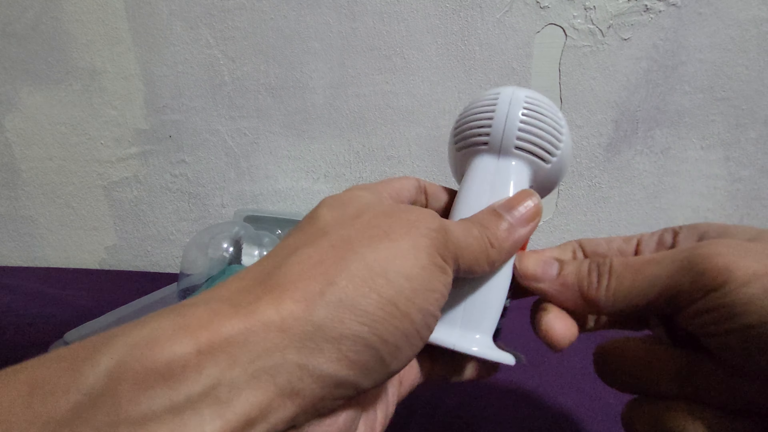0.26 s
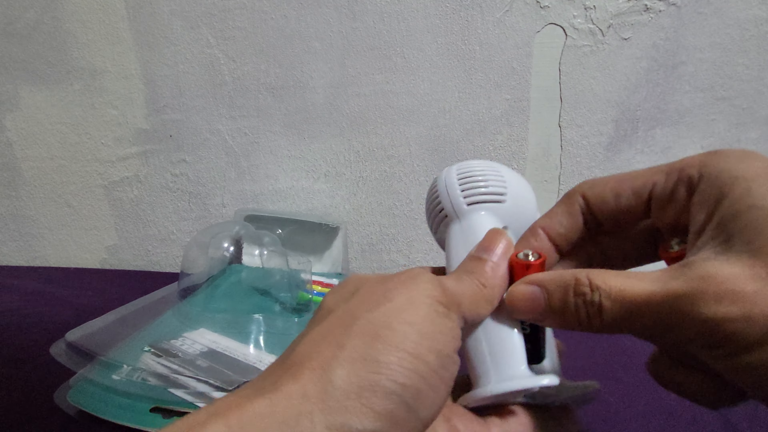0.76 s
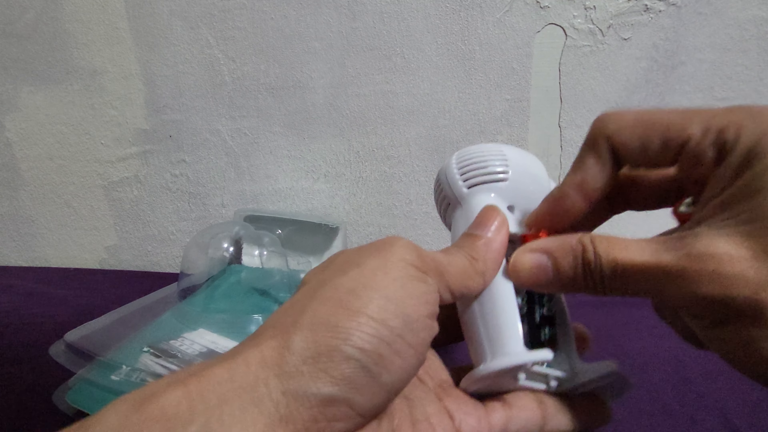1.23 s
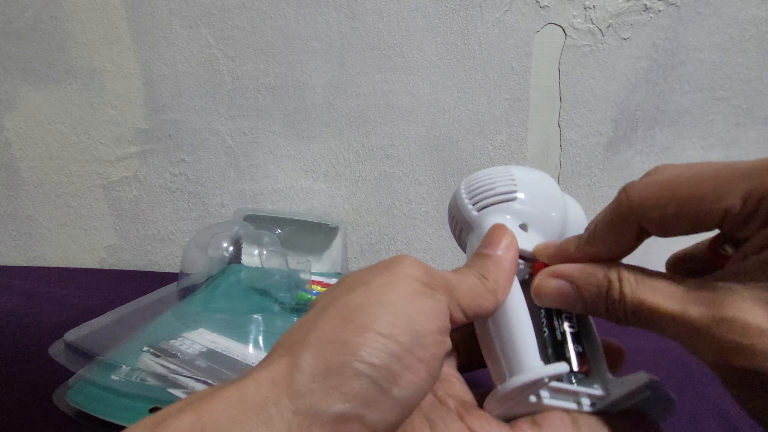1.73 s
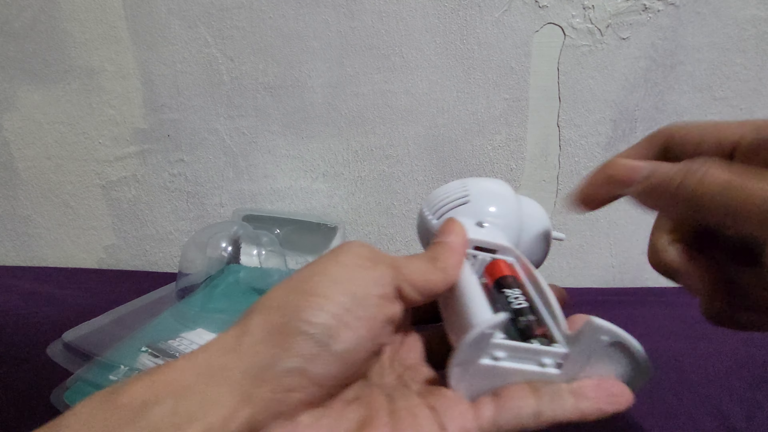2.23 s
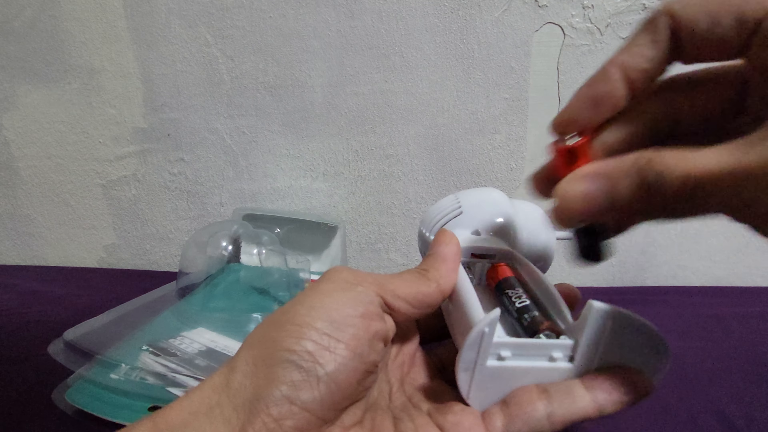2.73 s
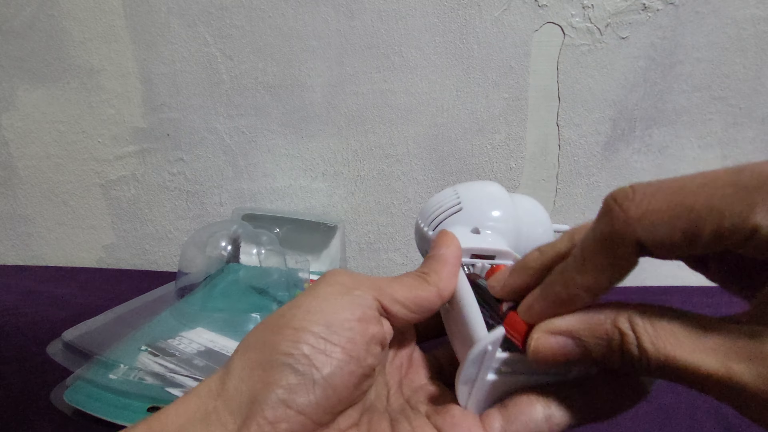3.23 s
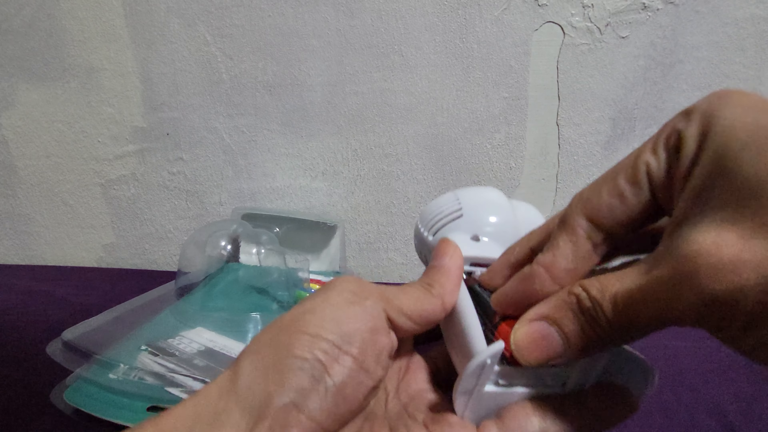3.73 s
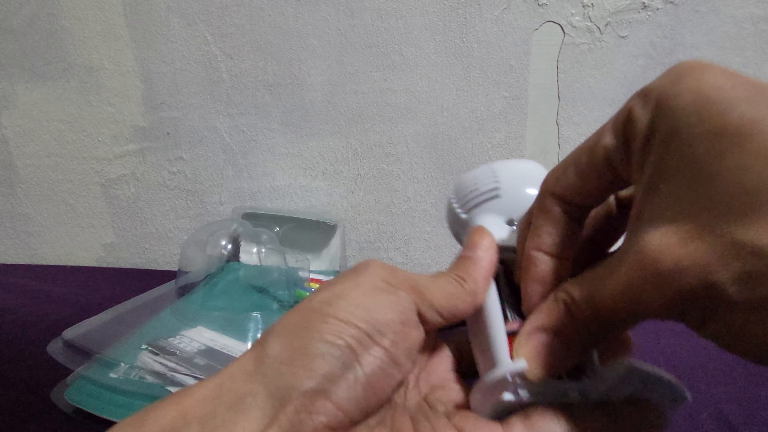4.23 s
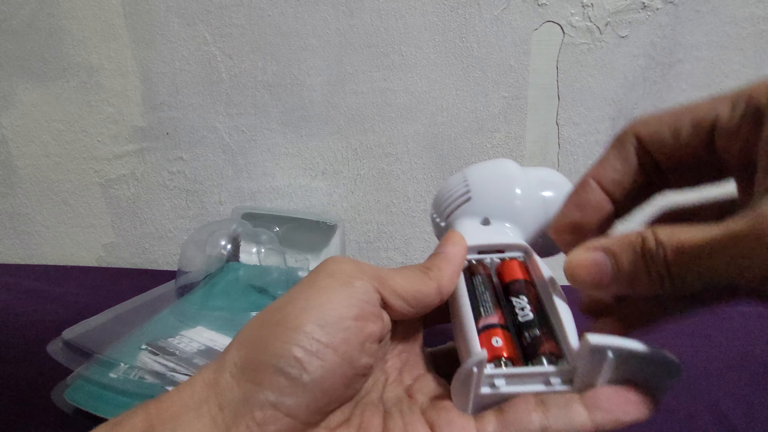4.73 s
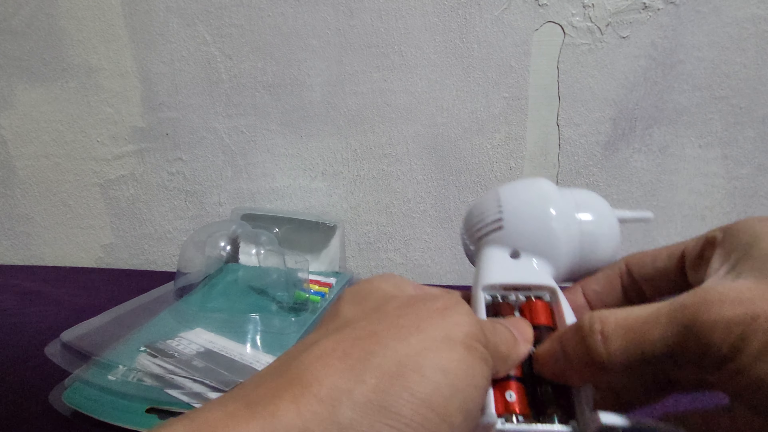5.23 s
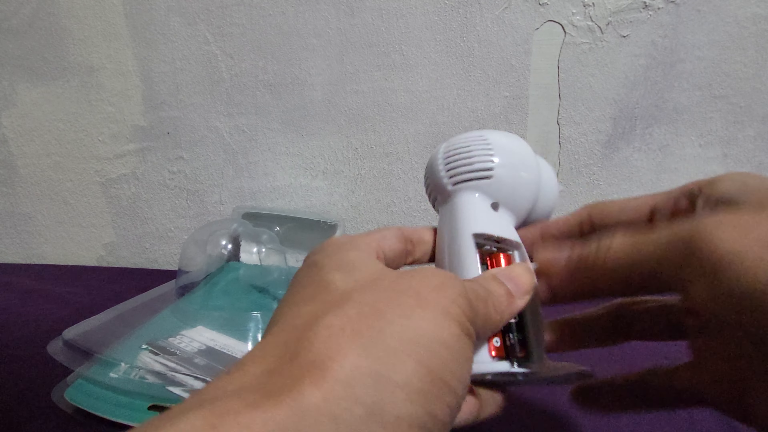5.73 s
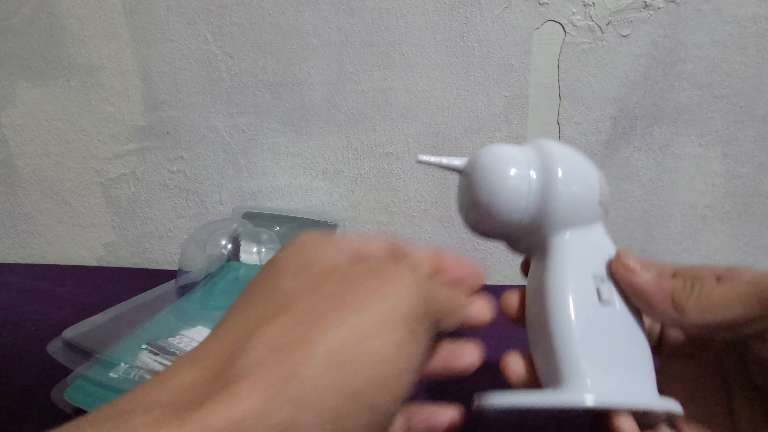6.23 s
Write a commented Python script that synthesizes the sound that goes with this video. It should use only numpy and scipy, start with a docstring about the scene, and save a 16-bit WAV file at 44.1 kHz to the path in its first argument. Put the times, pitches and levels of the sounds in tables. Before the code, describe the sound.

Two batteries are fitted into a light plastic gadget: scattered dry clicks and finger slides, a cluster of sharp snaps, a quiet gap of about a second, then a rough scrape with bright hard knocks. Later handling is faint. Close stereo pickup in a small room with short reflections, dull distant traffic rumble, and two barely noticeable soft tones dropping in pitch outside.

```python
"""Batteries going into a plastic gadget

Two batteries are pushed into the hollow handle of a small plastic gadget, close to a phone in a quiet room.
Every knock or slip is a burst of tiny pushes that rings the plastic; sliding fingers are dense friction grains.
A contact spring grates faintly, and sparse reflections make the room answer. Behind lie shaped noise for street
wash and microphone hiss, wavering tones for far engines and hums, and two brief tones that fall in pitch."""
import sys
import numpy as np
from scipy import signal
from scipy.io import wavfile
from scipy.ndimage import uniform_filter1d

SR = 44100
rng = np.random.default_rng(int(sys.argv[2]) if len(sys.argv) > 2 else 0)


def dump(signal):
    """Clip the signal to [-1, 1] and save it as 16-bit WAV at the path in sys.argv[1]."""
    limited = np.clip(np.atleast_2d(signal).T, -1, 1)
    pcm = np.round(limited * 32767).astype(np.int16)
    wavfile.write(sys.argv[1], SR, pcm)


N = 285327

# Ways each part of the gadget can vibrate, before the grip, the spot struck and damping change them:
# pitch_hz [Hz], level_db [dB, relative], fade_ms [ms to fall by 60 dB]
BASE = [(506, -14, 33), (653, -4, 8), (814, -0.5, 23), (925, -5.5, 38), (1120, -11, 12)]
HANDLE_AIR = [(1373, -9, 38), (1504, -9.5, 26)]
SHELL = [(1680, -4.5, 23), (1836, -1.5, 13), (2180, -6.5, 22), (2300, -9, 6.4)]
RIBS = [(2620, -2, 24), (2960, -12.5, 88), (3210, -1.1, 16), (3776, -3.75, 18), (4260, -3, 16),
        (4670, -9, 40), (5130, 2, 9.1)]
EDGES = [(5900, 0, 12), (6560, 0, 14), (7300, 0, 12), (8100, 0, 11), (8800, 0, 11), (9800, 0, 11),
         (10700, -1, 10), (11700, -3, 9), (12700, -4, 9), (13800, -6, 9), (15000, -8, 9)]
GADGET = [BASE, HANDLE_AIR, SHELL, RIBS, EDGES]


def amp(db):
    """Turns decibels into a plain multiplier."""
    return 10 ** (np.asarray(db) / 20)


def evened(x):
    """Scales a sound to an average (RMS) level of one."""
    return x / np.sqrt(np.mean(x ** 2) + 1e-20)


def unit(x):
    """Scales a ring so that the mean of its channels has an energy of one."""
    middle = np.atleast_2d(x).mean(0)
    return x / np.sqrt((middle ** 2).sum() + 1e-20)


def read(points, hz):
    """Reads a table of (pitch, value) at any pitch, evenly along a logarithmic pitch scale."""
    point_hz, value = np.transpose(points)
    return np.interp(np.log(hz + 1), np.log(point_hz + 1), value)


def curve(rows):
    """Joins the rows of a table by straight lines in time, one curve for each column after the first."""
    start_s, *columns = np.transpose(rows)
    return [np.interp(np.arange(N) / SR, start_s, column) for column in columns]


def resonate(x, hz, width_hz):
    """Shifts hz down to zero, smooths and shifts back: a resonance that follows a curve."""
    turn = np.exp(2j * np.pi * np.cumsum(hz * np.ones(N)) / SR)
    keep = np.exp(-np.pi * width_hz / SR)
    smooth = signal.lfilter([1 - keep], [1, -keep], x / turn)
    return 2 * (turn * smooth).real


def room_tone():
    """Steady low wash of the street and hiss of the microphones: noise shaped by pitch, with drifting patches."""
    # loudness of the noise over pitch: pitch_hz [Hz], density_db [dB per Hz, relative]
    noise_colour = [(30, -2.5), (54, 0.5), (167, -7), (223, -12.5), (298, -14.5), (378, -19), (455, -27.5),
                    (1000, -29), (1450, -34.5), (2500, -57), (4000, -60), (6300, -56), (8500, -49),
                    (10500, -48.5), (11700, -50.5), (13000, -56.5), (16000, -73)]
    # likeness of left and right: pitch_hz [Hz], likeness [no unit, limited below to -1..1]
    ear_likeness = [(60, 0.76), (150, 0.99), (380, 0.7), (950, -0.15), (2380, -1.6), (5980, -0.7),
                    (15000, 1)]
    # balance of the two sides: pitch_hz [Hz], left_minus_right_db [dB]
    ear_balance = [(60, 4), (240, -0.5), (950, 0.5), (3770, -7), (15000, 7)]
    # swell of the deepest rumble: time_s [s], level_db [dB, relative]
    traffic_swell = [(0, -5.5), (1.5, -3.5), (3.998, -3), (6.47, -2)]
    level_db = -46

    frames, hz = N // 512 + 5, np.fft.rfftfreq(2048, 1 / SR)
    a, b, c, d, patches, drift = rng.standard_normal((frames, 1025, 6)).T
    patches = evened(uniform_filter1d(uniform_filter1d(patches, 12, 0), 10, 1))
    # broad slow changes of colour
    drift = evened(uniform_filter1d(uniform_filter1d(drift, 150, 0), 25, 1))

    same = np.clip(read(ear_likeness, hz), -1, 1)[:, None]
    left, other = a + 1j * b, c + 1j * d
    spectrum = np.array([left, same * left + np.sqrt(1 - same ** 2) * other])

    half_lean_db = read(ear_balance, hz)[:, None] / 2
    swell_db = np.interp(np.arange(frames) * 512 / SR, *np.transpose(traffic_swell))
    swell_db = swell_db * (hz < 110)[:, None]
    shape_db = read(noise_colour, hz)[:, None] + swell_db + 1.3 * patches + 0.89 * drift
    spectrum *= amp(shape_db + np.array([half_lean_db, -half_lean_db]))
    noise = signal.istft(spectrum, nperseg=2048, noverlap=1536)[1][:, :N]
    return amp(level_db) * evened(noise)


def drones():
    """Far engines and machine hums: steady tones mixed with narrow wavering noise, stronger on the left."""
    # two engines and a mains hum that starts up: time_s [s], pitch_hz [Hz], level_db [dB, before the mix below]
    engine_low = [(1.0, 62, -62), (1.6, 64.2, -50), (1.85, 60.8, -43.5), (2.05, 61.3, -45),
                  (2.32, 60.6, -44.5), (2.45, 62.24, -61), (2.78, 63.65, -44), (3.1, 63.6, -45),
                  (3.9, 63.5, -50.5)]
    engine_high = [(4.65, 84.4, -49.5), (5.1, 86.4, -55.5), (5.55, 90.4, -51.5), (5.748, 86, -55),
                   (6.1, 84.55, -45.5), (6.47, 84.1, -52)]
    mains_hum = [(2.0, 101.1, -63.5), (2.999, 99.9, -49), (6.47, 100.3, -53)]
    # wavering hums: pitch_hz [Hz], width_hz [Hz], level_db [dB, before the left-right balance]
    wavering_hums = [(170.4, 6.8, -56), (250.7, 8.1, -59.5), (293.5, 3.7, -59), (968, 17, -75.5)]

    out, t = np.zeros(N), np.arange(N) / SR
    for rows in (engine_low, engine_high, mains_hum):
        hz, level_db = curve(rows)
        narrow = resonate(rng.standard_normal(N), hz, 3.0)
        waver = evened(resonate(narrow, hz, 3.0))
        steady = np.sqrt(2) * np.sin(2 * np.pi * np.cumsum(hz) / SR)
        start_s, end_s = rows[0][0], rows[-1][0] + 0.18
        fade = np.clip(np.minimum(t - start_s, end_s - t) / 0.11, 0, 1)
        out += fade * amp(level_db) * (0.81 * steady + 0.3 * waver)
    for hz, width_hz, level_db in wavering_hums:
        out += amp(level_db) * evened(resonate(rng.standard_normal(N), hz, width_hz))
    return out * amp([[1.2], [-1.2]])


def all_round(modes, damping):
    """A part's ring with no favoured direction or grip: every mode sounds, and damping shortens them all."""
    hz, level_db, fade_ms = np.transpose(modes)[:, :, None]
    t = np.arange(800) / SR
    sign = (-1.0) ** np.arange(len(modes))[:, None]
    rise = 1 - np.exp(-t * hz)
    decay_db = -60 * 1000 * t / (damping * fade_ms)
    waves = sign * rise * amp(level_db + decay_db) * np.sin(2 * np.pi * hz * t)
    return unit(waves.sum(0))


def strokes():
    """Each stroke rises, holds and fades; returns the power of all, and their level-weighted brightness."""
    # fingers and battery sliding on the plastic:
    # start_s [s], hold_s [s], level_db [dB, nominal], brightness_db [dB on the thin edges, limited later]
    stroke_rows = [(0, 0.086, -74, -8), (0.216, 0.14, -69, -7), (0.474, 0.071, -64, -6),
                   (.6, 0.12, -63, -10.5), (.87, 0.012, -69, -3), (1.264, 0.042, -63.5, -11),
                   (1.593, 0.062, -66, -4), (1.832, 0.2, -67.5, -2), (2.894, 0.027, -69.5, -23),
                   (3.064, 0.065, -69, 0), (3.165, 0.092, -52, -6.5), (3.21, 0.021, -58.5, -7.5),
                   (3.399, 0.013, -59.5, -7.5), (3.695, 0.12, -59.5, -4.5), (3.944, 0.079, -64.5, -5),
                   (4.097, .12, -71, -6), (4.39, 0.072, -79, 0.5), (4.59, 0.061, -66, 0.5),
                   (4.859, 0.14, -71, -3.5), (5.15, .03, -80.5, -8), (5.3, 0.039, -76, -10.5),
                   (5.671, .11, -69, 1), (6.043, 0.35, -74.5, 3)]
    rise_db_per_s, fall_db_per_s = 257, 175

    start_s, hold_s, level_db, bright_db = np.transpose(stroke_rows)[:, :, None]
    t = np.arange(N) / SR - start_s
    fade_db = rise_db_per_s * np.minimum(t, 0) - fall_db_per_s * np.maximum(t - hold_s, 0)
    power = amp(2 * (level_db + fade_db))
    total = power.sum(0)
    return total, (power * bright_db).sum(0) / total


def rubbing():
    """Dense uneven grains of friction ring the parts of the gadget, damped by the grip."""
    # share of each part, base to edges: level_db [dB, before the stroke's loudness and brightness]
    part_levels = [-5.5, -4, -5.5, -1.5, -1.5]

    power, bright_db = strokes()
    bright_db = np.minimum(bright_db, 3)
    clumps = evened(uniform_filter1d(rng.standard_normal(N), 500))
    # sparse catches, about 150 a second, ring all but the edges
    snags = amp(1.6 * np.minimum(rng.exponential(1, N), 4)) * (rng.random(N) < 150 / SR)

    out = np.zeros((2, N))
    for modes, level_db, is_edge in zip(GADGET, part_levels, [0, 0, 0, 0, 1]):
        sizes = amp(rng.exponential(1, N)) * (rng.random(N) < 0.1)
        grains = sizes * rng.standard_normal((3, N))
        # each side has its own grains, plus some shared by both
        grains = grains[:2] + 0.21 * grains[2] + (1 - is_edge) * 0.95 * snags
        body = all_round(modes, damping=0.31)
        rung = signal.oaconvolve(grains, body[None], axes=1)[:, :N]
        out += amp(level_db + is_edge * bright_db) * evened(rung)
    return np.sqrt(power) * amp(4.0 * clumps) * out


def leaning(modes, lean_db):
    """A blow on the short stiff members favours a part's upper modes, one on the long members its lower."""
    tilt_db = lean_db * np.linspace(-0.8, 0.8, len(modes))
    return [(hz, db + more, fade_ms) for (hz, db, fade_ms), more in zip(modes, tilt_db)]


def parts_of(ribs_db, base_db, air_db, shell_db, edges_db):
    """The modes of every part and the energy that one blow gives them."""
    ribs = leaning(RIBS, -0.38 * shell_db)
    # bright blows favour the upper modes of the edges
    edges = leaning(EDGES, 1.5 + 0.22 * edges_db)
    energy_db = ribs_db + np.array([base_db, air_db, shell_db, 0, edges_db])
    return zip(GADGET[:3] + [ribs, edges], energy_db)


def ring(modes, spot_db, detune, apart, swarm_db=-0.5, count=3):
    """A part's ring at both microphones: spot and grip vary its modes, each amid weaker, shorter ones."""
    hz, level_db, fade_ms = np.repeat(modes, count, axis=0).T[:, :, None]
    t = np.arange(800) / SR
    spot, tune, side, turn = rng.standard_normal((4, len(hz), 1))
    swarm = (np.arange(len(hz)) % count > 0)[:, None]
    hz = np.minimum(hz * (1 + np.where(swarm, 0.07, detune) * tune), SR / 2.5)
    fade_ms = fade_ms * np.where(swarm, 0.6, 1)

    # short waves differ most between the microphones
    reach = np.clip(hz / 5000, 0, 1)
    ears = np.array([1, -1])[:, None, None] * apart * reach

    # a mode needs part of a cycle to build up
    rise = 1 - np.exp(-t * hz / 0.3)
    ringing = rise * np.exp((2j * np.pi * hz - np.log(1000) * 1000 / fade_ms) * t)
    size_db = level_db + swarm * swarm_db + spot_db * spot + 2.0 * ears * side
    size = np.sign(spot) * amp(size_db) * np.exp(1j * ears * turn)
    return unit((size[:, :, 0] @ ringing).imag)


def knocks():
    """Each blow swells briefly and faintly, hits and dies in tiny slips; returns direct sound and room feed."""
    # knocks and slips: start_s [s], ribs_db [dB of energy given to the ribs],
    # base_db, air_db, shell_db, edges_db [dB relative to the ribs],
    # slip_ms [ms, nominal length of the slip], left_minus_right_db [dB]
    blow_rows = [(0.014, -37.5, -14, 0, -7, -1, 4.9, 2), (0.064, -47, -1, -16.0, -3, 9.5, 0.72, 4),
                 (0.181, -46, 7.0, 9, 10, -15, 0.33, -18), (0.1922, -15.5, -7.5, -6.5, -16, 2.0, 0.74, 0),
                 (0.218, -27, -10, -19, -6, 12, 0.36, -1), (0.289, -29.0, -14, 6, -16, -4, 6.0, -2),
                 (0.301, -23, -19.5, -13, -29, 6.5, 1.3, 3.5), (0.3373, -33.5, -10, -5, 6.0, -9, 7, -10),
                 (0.3512, -24.5, 0.5, 13.5, 4.5, -7, 1.96, 0.5), (0.385, -33.5, 4, -7, 2.0, -3, 2.6, 0),
                 (0.435, -54, 23.0, 23, 20, 5.0, 1.7, 1.0), (0.4669, -39.5, 1, -1, 9.5, 4, 3.6, 4),
                 (0.5087, -43, -15, 3.0, 8, 6.5, 11.0, 4), (0.535, -48.0, 15, 18, 21, 4.0, 0.85, 2),
                 (0.5552, -27.5, -4, 4.5, -2, -1.5, 3.5, 4), (0.5745, -35, 4, 3, -1, 1, 2.3, 3.0),
                 (0.6207, -31, -3.5, -0.5, -3, -10, 8, 1), (0.6557, -28, -22, 3.5, -8.0, -10, 8.9, -2),
                 (0.6995, -45.5, 9, 10, 12.5, -4, 21, -3), (0.7238, -27, -1.5, -1.5, 1.5, -9.5, 12, 2),
                 (0.8621, -27.5, 4.5, 8.5, -0.5, -2.5, 1.44, 2.5), (1.034, -54.5, 11, 16, 5, 9, 1.3, 1.0),
                 (1.2242, -34.5, 0, -1, -18.0, -1, 5.3, 4), (1.243, -31, -8, 6, 1, -15, 4, 0),
                 (1.2492, -16.5, -22, -33, -26, 2.5, 1.5, 2), (1.259, -22.5, -8, -6, -25, 1, 0.34, -6),
                 (1.2699, -19, -10, -1.5, -12.5, 3, 2.8, 4), (1.3197, -28.5, -13.5, -5, -3, -13, 20, 1.0),
                 (1.355, -45, 2, -1.0, 11, -5.0, 4.1, 3), (1.5033, -44.5, 8, 15.5, 2, -1.0, 1.9, 1.0),
                 (1.594, -21.5, -10, -21, -23, -4, 4.6, -1), (1.6003, -16.5, -1.5, 6, -6.5, -5, 0.47, 4),
                 (1.6337, -36, -15, -15, -9.0, 0, 2.8, 2), (1.6459, -30.5, -5, -12.5, -6, -18, 8, 1),
                 (1.775, -47, 6.0, 10, 0, 3, 1.0, -2.0), (1.8267, -12, -5.5, -2.5, -19, 3.5, 1.1, 1),
                 (1.8318, -39, -2, -5, -2, 21, 0.67, 4), (1.851, -2.5, -3, -7.5, -6.5, -1.5, 0.21, 1.5),
                 (1.961, -11.0, -6.5, -12.5, -5, -0.5, 0.94, 0.5),
                 (2.16, -51.0, 7, 0.5, 3.0, 10.0, 1.02, 2), (2.8754, -34.5, 6.5, 11.0, 6.5, -6, 2.86, 3),
                 (3.0255, -37.5, 7.0, 4.5, 3, 4, 7.1, 3), (3.0502, -29, -9.0, -3, 3.5, -14, 1.05, 7),
                 (3.0702, -35.5, -14.0, 0, 0, -10, 7.2, 7), (3.125, -24, -4, -3, 1.5, -7, 0.38, 6.5),
                 (3.1563, -16, -17, -31, 0, -2, 7.7, 6.5), (3.1723, -38, 0.0, 16, 7.0, -6, 0.64, 0.0),
                 (3.1845, -13, -28, -37, -14, 0.0, 0.72, 8.5), (3.194, -17.5, -18, -21, -17, -1, 11, -5),
                 (3.2134, -1, -10, -26, 6, -6.5, 0.16, 0), (3.2168, -3.5, -19.5, -5, -9, -9, 0.36, 9.5),
                 (3.3793, -22.5, -27, -38.5, -8, 0, 0.97, 6.5), (3.4258, -43.5, -1.5, 2.5, 4, 2, 5.2, -4),
                 (3.4416, -43.5, 2.5, 13, 9.5, -2, 0.81, 5), (3.663, -15, -4.5, -19, 4.5, 2, 0.61, 3.5),
                 (3.766, -18, -13, -7, -10, -2.5, 5.2, 3), (3.9061, -20, -12, -30, -11.5, 3, 1.5, 11),
                 (3.9125, -17.5, -11, -23, -11.5, 4.5, 3.7, -2),
                 (3.9629, -21.0, -15, -15, -28, 1.0, 0.96, -2), (3.997, -33, -7.0, -8, -17, 1, 1.3, -7),
                 (4.002, -21, 1.0, -16, 2.5, 0, 0.4, 4.5), (4.1338, -41, 8, -13.5, -12, -1.5, 14.0, 6),
                 (4.1703, -44, -0.5, -12, 2.5, -8.5, 0.57, -2),
                 (4.279, -41.5, 7.5, -5.5, -18.5, -8, 8.2, 0.0),
                 (4.446, -42.0, -3.5, -8.5, -22.5, -0.5, 0.77, 4),
                 (4.512, -43.5, 0.5, 3.5, -11, -2, 1.07, 2), (4.5773, -41.0, -2, -0.5, -16, -4.5, 2.4, 9),
                 (4.5974, -33, -13, -3, -11, 3, 3.7, 1.5), (4.6807, -21, -4.5, -3.5, -14, 1.5, 0.15, 3),
                 (4.8306, -51.5, -3.5, 16, -6, 4.5, 3.1, -1), (4.886, -48.0, 11, 6, -5, 2, 4.4, 3),
                 (4.935, -56.5, 8, 26, 8.0, -3, 1.8, 0), (4.983, -35, 3.0, 2.5, -9, 5, 0.91, -2),
                 (4.9947, -39.0, -2, -4.5, -6.0, -2.5, 2.2, 7), (5.0955, -48, 13.5, -4, -7, 0, 1.0, 2.5),
                 (5.294, -38, -1, 5, 0.5, -4.0, 2, 0.5), (5.544, -44.5, 5.5, 8, 3, -16, 1.7, 1),
                 (5.5955, -58, 15.5, 18, 14.5, 8.5, 2.8, 0), (5.6612, -44, 11, 6.5, -3, 4.5, 1.45, 3.0),
                 (5.775, -48, -17.0, 12.5, -15, 4, 3.6, -0.5), (6.0322, -41.0, 6.5, 6, 0.5, 2.0, 4.4, -3.5),
                 (6.0837, -42, 2.5, -10, -1, -7.5, 2.5, -12), (6.1602, -38.5, 3, -1, 0, -4.0, 9.2, -5)]

    out, sent = np.zeros((2, N + 4000)), np.zeros(N + 4000)
    t = np.arange(-300, 900) / SR  # zero is the moment of the hit
    for start_s, *energy_db, slip_ms, pan_db in blow_rows:
        slip_s = max(slip_ms, 0.1) / 1000
        lead_in = 0.05 * np.exp(np.minimum(t, 0) / (0.0012 + 0.6 * slip_s))
        burst = np.clip(t / (0.043 * slip_s), 0, 1) * np.exp(-t.clip(0) / (0.86 * slip_s))
        hit = np.maximum(burst, lead_in * (t < 0.2 * slip_s))
        push = np.where(t < 0, lead_in, hit)

        sound = 0
        sent_at = round((start_s + slip_s / 2) * SR)
        for modes, level_db in parts_of(*energy_db):
            force = push * rng.standard_normal(len(t)) * (rng.random(len(t)) < 0.3)
            # short blows start with a clean tick
            force[t == 0] += 6.3 * np.exp(-slip_ms / 0.47)
            crack = all_round(modes, damping=0.45)
            body = ring(modes, spot_db=2.0, detune=0.017, apart=1.0) + 0.9 * crack
            sound = sound + amp(level_db) * unit(signal.fftconvolve(force[None], body, axes=1))
            sent[sent_at:][:len(crack)] += amp(level_db) * crack

        at = round((start_s + t[0]) * SR)
        out[:, at:at + sound.shape[1]] += sound * amp([[pan_db / 2], [-pan_db / 2]])
    return out[:, :N], sent[:N]


def room(x):
    """Sparse reflections that swell when the far walls answer, each band dying at its own speed."""
    # how fast the room dies away: pitch_hz [Hz], fade_s [s to fall by 60 dB]
    room_fade = [(600, 0.24), (1500, 0.17), (4000, 0.15), (12000, 0.14)]

    taps = np.zeros((2, SR // 2))
    # one reflection of random sign in every 20 samples
    at = np.arange(60, SR // 2 - 20, 20)
    at = at + rng.integers(0, 20, (2, len(at)))
    np.put_along_axis(taps, at, rng.choice([-1.0, 1.0], at.shape), 1)
    s = np.arange(SR // 2) / SR
    taps *= 1 - 0.076 * np.exp(-(s / 0.07) ** 2)
    # the far walls, around 24 ms
    taps *= 1 + 0.6 * np.exp(-((s - 0.024) / 0.007) ** 2)

    hz, t, bands = signal.stft(taps, SR, nperseg=256)
    decay_db = -60 * t / read(room_fade, hz)[:, None]
    tail = signal.istft(bands * amp(decay_db), SR, nperseg=256)[1]
    tail[:, :60] = 0
    return signal.fftconvolve(x, tail / np.linalg.norm(tail[0]), axes=1)[:, :N]


def coos():
    """Soft tones that sag in pitch, somewhere outside: sine waves under a smooth swell."""
    # brief far tones: start_s [s], length_s [s], start_hz [Hz], end_hz [Hz], level_db [dB, doubled in size below]
    coo_rows = [(0.487, 0.12, 382, 333, -54.5), (2.614, 0.15, 376.5, 343, -58.5)]

    out = np.zeros(N)
    for start_s, length_s, start_hz, end_hz, level_db in coo_rows:
        hz = np.linspace(start_hz, end_hz, round(length_s * SR))
        wave = np.sin(2 * np.pi * np.cumsum(hz) / SR)
        out[round(start_s * SR):][:len(hz)] = amp(level_db) * 2 * np.hanning(len(hz)) * wave
    return out


def creak():
    """The contact spring grates faintly while the first battery presses it: sparse grains ring two resonances."""
    # resonances of the spring: pitch_hz [Hz], width_hz [Hz], level_db [dB, relative]
    spring_modes = [(5200, 380, -9), (8200, 250, -8.5)]
    # loudness of the grating: time_s [s], level_db [dB, before the resonances' own levels]
    grating_level = [(.95, -100), (1.03, -75), (1.18, -72), (1.24, -100)]

    grains = rng.standard_normal(N) * (rng.random(N) < 0.02)
    out = np.zeros(N)
    for hz, width_hz, level_db in spring_modes:
        out += amp(level_db) * evened(resonate(grains, hz, width_hz))
    return amp(curve(grating_level)[0]) * out


def scene():
    """Adds the handling sounds, their answer from the room, and the background."""
    direct, sent = knocks()
    rubs = rubbing() + creak()
    reflected = amp(-10.0) * room(sent + rubs)
    return direct + rubs + reflected + room_tone() + drones() + coos()


def record(dry):
    """The microphones' bass cut, then the band limit of the recorder."""
    bass_cut_hz, treble_limit_hz = 38, 15900
    thin = signal.sosfilt(signal.butter(6, bass_cut_hz, "high", fs=SR, output="sos"), dry)
    band_limit = signal.firwin(511, treble_limit_hz, window=("kaiser", 9), fs=SR)
    return signal.oaconvolve(thin, band_limit[None], "same")


dry = scene()
out = record(dry)
dump(out)
```